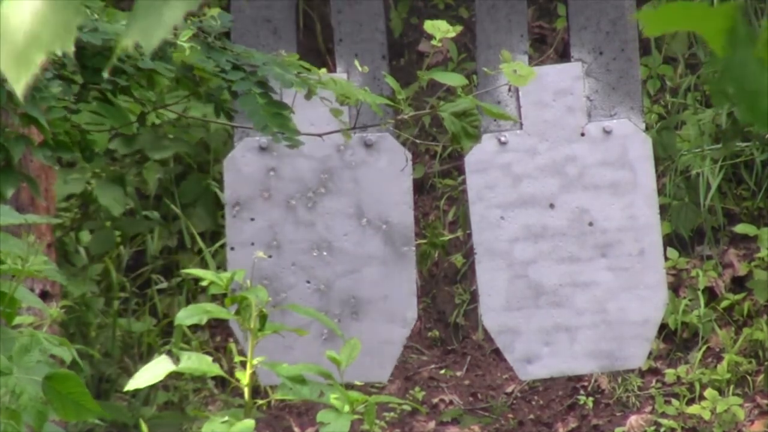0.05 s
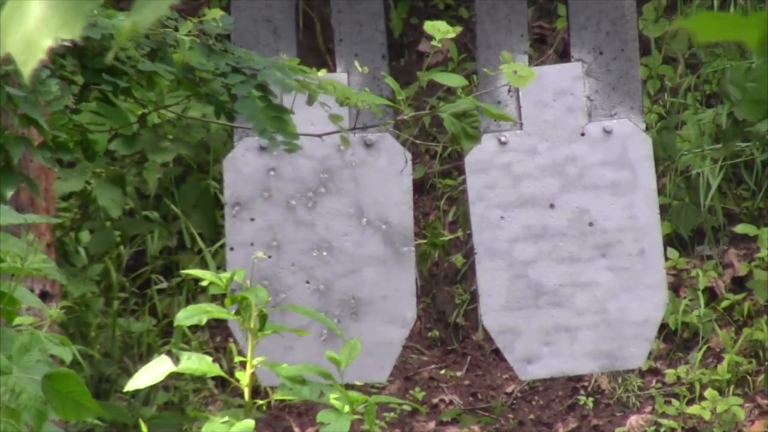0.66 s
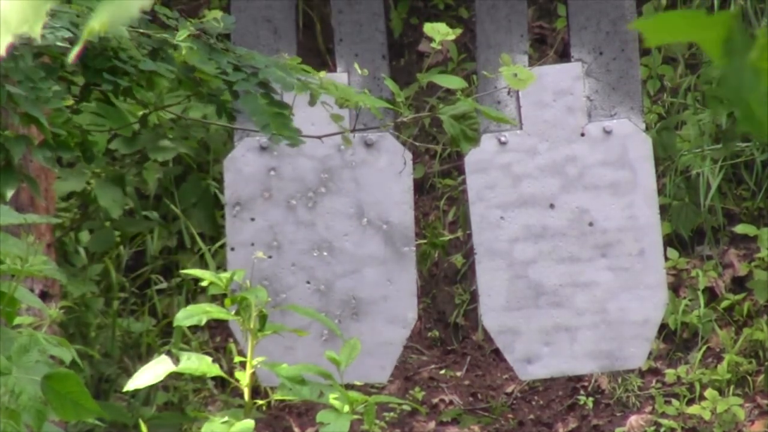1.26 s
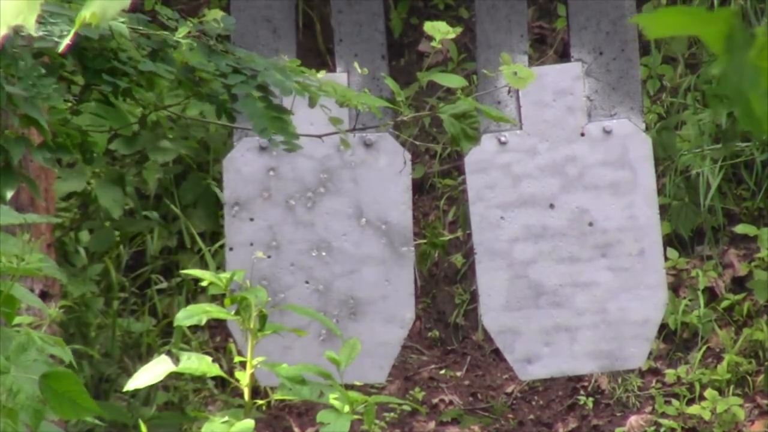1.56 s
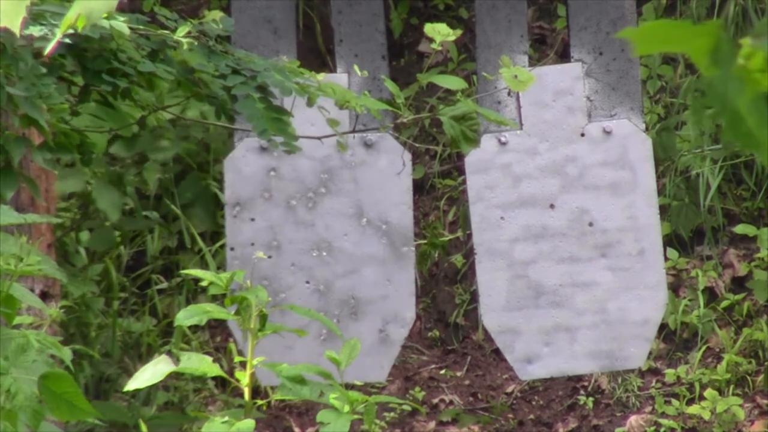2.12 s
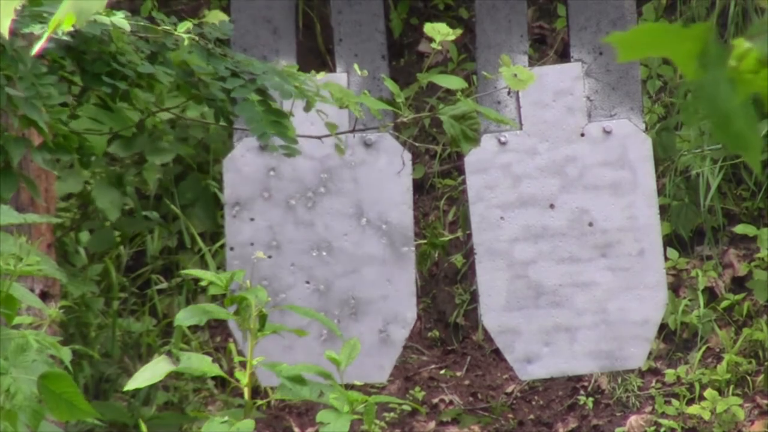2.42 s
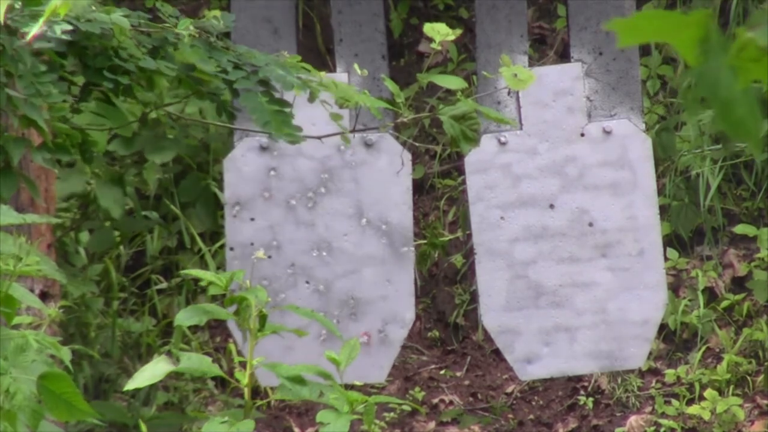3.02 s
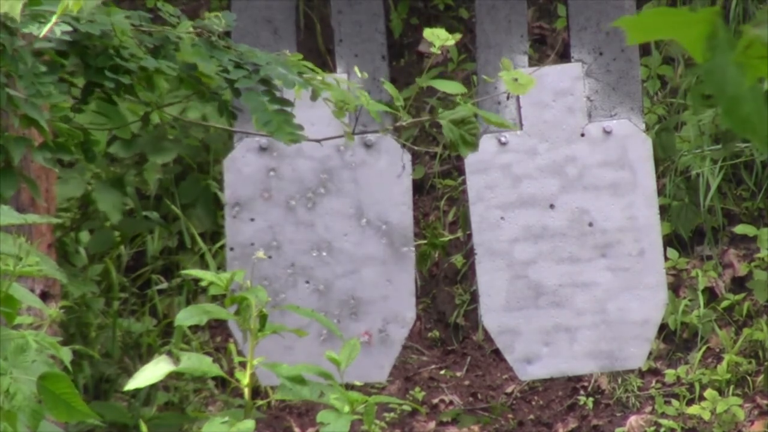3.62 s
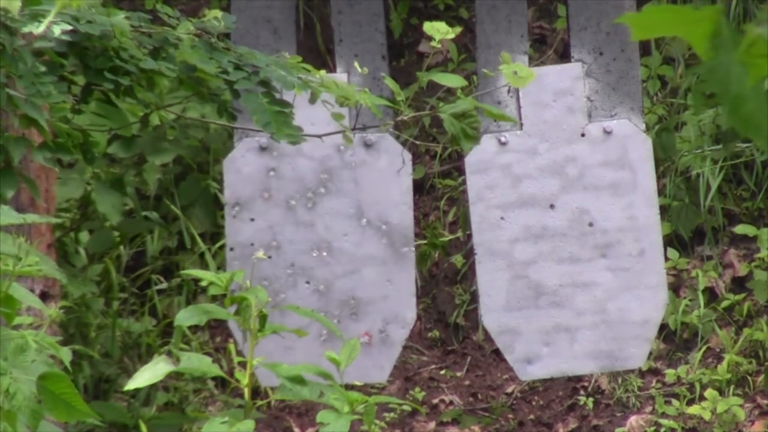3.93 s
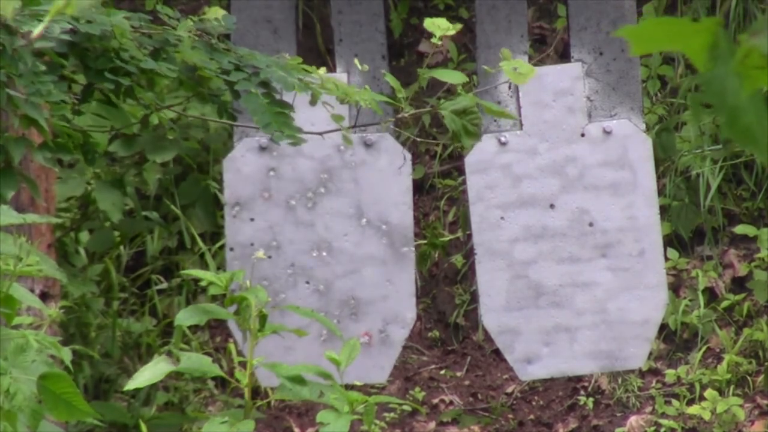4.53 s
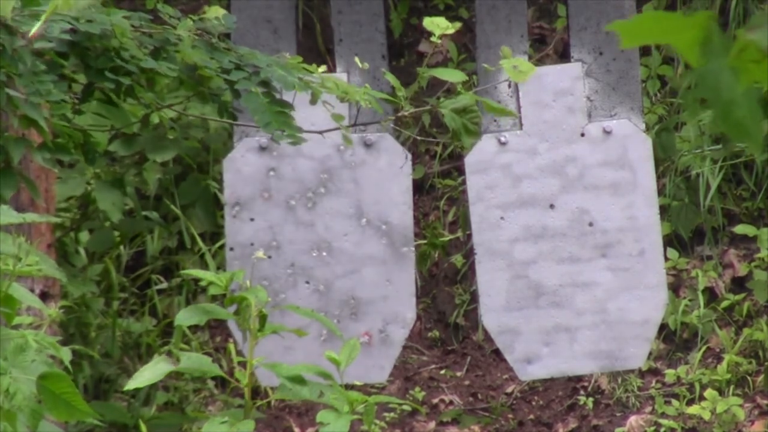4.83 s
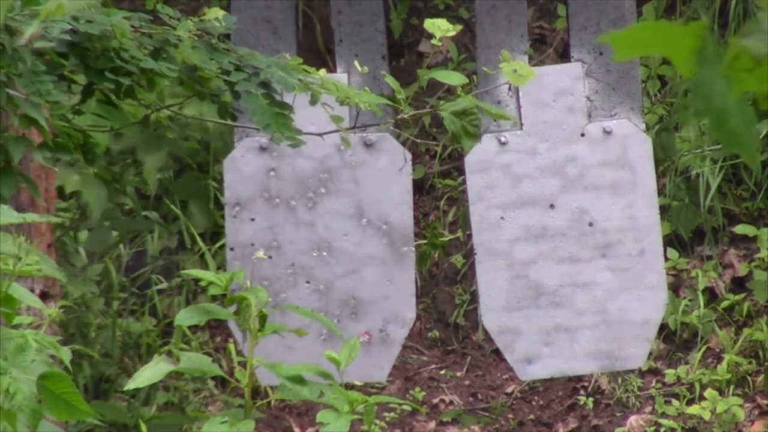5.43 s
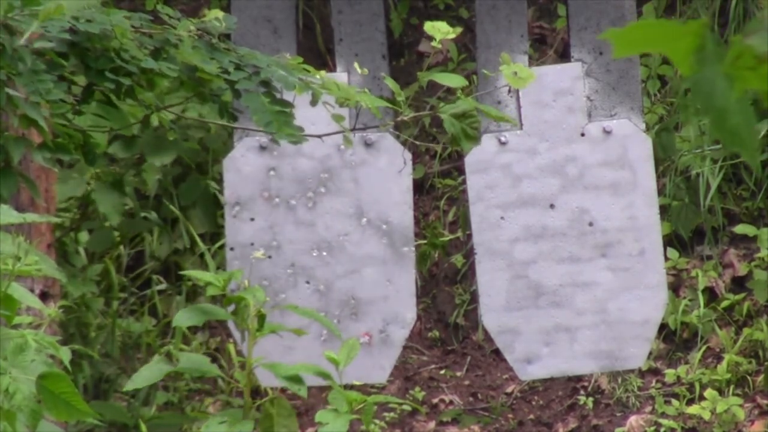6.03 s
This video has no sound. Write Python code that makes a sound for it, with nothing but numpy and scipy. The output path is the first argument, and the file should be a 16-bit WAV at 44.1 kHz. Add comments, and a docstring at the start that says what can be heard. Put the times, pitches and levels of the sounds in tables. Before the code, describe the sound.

Heard from beside steel plates at the edge of a quiet wood, a rapid string of about ten rifle shots cracks in, slamming and ringing the metal and slightly distorting the microphone. Two duller, distant rifle reports follow, and small fragments patter onto leaves and ground. After this short lull, a second string of five loud clanging hits arrives, each trailing a dark echo.

```python
"""Rapid rifle fire on two steel plates at the edge of a wood, heard from beside the plates.
Each bullet cracks past, splashes on the steel and rings it; the trees scatter the bang.
Rifle reports swell in from far off, and bits of debris drop through the leaves, mostly in
the pause, over a quiet bed of air. The microphone overloads with a low thump on the hits,
and a limiter holds each bang flat."""
import sys
import numpy as np
from scipy import signal
from scipy.fft import rfft, irfft
from scipy.io import wavfile
from scipy.ndimage import uniform_filter1d

SR = 44100
rng = np.random.default_rng(int(sys.argv[2]) if len(sys.argv) > 2 else 0)


def int16_out(signal):
    """Quantize to a 16-bit WAV file."""
    q = np.round(np.clip(np.atleast_2d(signal).T, -1, 1) * 32767)
    wavfile.write(sys.argv[1], SR, q.astype(np.int16))


N = 276066

# bullets on steel: t/s, strength/dB, lead of the supersonic crack/s, main plate mode trim/dB
BULLET_HITS = [(-.095, -.5, 0.018, 5), (.480, .3, 0.02, -3), (1.092, 1, 0.016, -4),
               (1.352, 0.1, 0.018, 0.5), (1.605, -0.5, 0.015, -18), (1.802, -0.5, 0.019, -19),
               (2.066, 0.9, .014, -4), (2.460, -.5, .016, 1), (2.651, -0.4, 0.023, -1.5),
               (2.822, -0.5, 0.015, -22), (5.088, -0.9, 0.016, -6), (5.327, -2.1, .012, -9),
               (5.505, 0.5, 0.016, -5), (5.767, -0.2, 0.0045, -3), (6.122, -2.5, .016, -3)]
# far muzzle reports: t/s, level/dB, swell/s
FAR_REPORTS = [(.923, -12, 0.027), (3.022, -14.5, 0.0096), (3.219, -11, 0.036)]
# small bits landing: t/s, level/dB, centre f/Hz
DEBRIS_TAPS = [(1.209, -34, 11000), (2.748, -30, 11000), (2.915, -34, 11000), (3.066, -37, 8100),
               (3.147, -40.5, 7860), (3.240, -16.5, 2170), (3.595, -29, 1850), (4.266, -33.5, 2170),
               (4.378, -31.5, 1790), (4.524, -38, 4930), (4.582, -37, 970)]
# larger pieces landing: t/s, level/dB, knock f/Hz, knock/dB, time until flat/s, scrape/dB, thud/dB
DEBRIS_CLACKS = [(3.828, -18, 1490, 2.5, .026, -20.5, -40), (4.147, -18.5, 4400, 2, 0.024, -4.5, -9)]
# steel plate modes, the main one first: f/Hz, level/dB relative to the bang
PLATE_MODES = [(2283, -14), (583, -23), (1012, -22), (1281, -23), (1685, -19), (2988, -24), (4403, -23),
               (4909, -22), (6696, -23), (7665, -25), (8130, -27), (8548, -29), (9062, -32), (9399, -31),
               (9657, -33), (10249, -32), (10992, -36), (11337, -35), (12696, -41), (13632, -41)]
# tone of the crack and splash, the bang, the wood's echo, the far rifle, the air: f/Hz, level/dB
SPLASH_EQ = [(30, 8), (150, 11.5), (500, 9.5), (1500, 6), (3000, 4.5), (6000, -2.5), (10000, -11.5),
             (16000, -21.5)]
BANG_EQ = [(30, -14.5), (130, -20), (250, -19.5), (400, -8), (550, -1.5), (800, -2), (1500, 0),
           (2300, -0.5), (4000, -1), (6000, -9), (9000, -18), (12000, -23.5), (16000, -39)]
ECHO_EQ = [(30, -32), (110, -17), (250, -10.5), (520, 6), (1000, 6.5), (2000, 5), (4000, -11), (8000, -28),
           (16000, -64)]
REPORT_EQ = [(30, -22), (130, -24), (250, -21), (500, -2.5), (900, 3.5), (1500, 2), (2500, -2.5),
             (4000, -8.5), (7000, -19.5), (11000, -33), (16000, -46)]
AIR_EQ = [(15, -25), (25, 11), (66, -20), (123, 4.5), (185, -1.5), (317, -1), (416, -1), (695, 0),
          (1100, -3), (3340, -10), (10700, -27.5), (14800, -26), (16000, -22)]
# decay of the steel, the near trees and the deep wood: f/Hz, t60/s
STEEL_DECAY = [(500, .45), (2300, .4), (5000, .28), (8000, .24), (14000, .2)]
NEAR_DECAY = [(100, 0.22), (500, 0.53), (1500, 0.34), (3000, 0.3), (6000, 0.27), (12000, 0.22)]
DEEP_DECAY = [(100, 1.0), (600, 1), (2000, 0.66), (8000, 0.74)]
# stereo width, nearly mono in lows and mids, wider in the treble: f/Hz, side level/dB relative to mid
STEREO_WIDTH = [(50, -46), (130, -46), (400, -60), (1000, -64), (2000, -31), (4000, -23.5), (8000, -11.5),
                (14000, -7)]


def amp(db):
    """Decibels to gain."""
    return 10 ** (np.asarray(db) / 20)


def unit_rms(x):
    """Scales to rms 1."""
    return x / np.sqrt(np.mean(x ** 2) + 1e-20)


def curve(points, hz):
    """Reads a table on a log-frequency axis."""
    f, value = np.transpose(points)
    return np.interp(np.log(hz + 1), np.log(f + 1), value)


def add(mix, s, sound):
    """Mixes a sound in at time s."""
    start = round(s * SR)
    sound = sound[..., max(-start, 0):]
    part = mix[:, max(start, 0):][:, :sound.shape[-1]]
    part += sound[..., :part.shape[1]]


def attack(seconds):
    """One second of a smooth rise toward 1."""
    return 1 - np.exp(-np.arange(SR) / SR / seconds)


def decay(t60):
    """One second of exponential fade."""
    return np.exp(-np.log(1000) * np.arange(SR) / SR / t60)


def waver(step_s, depth_db):
    """One second of gain that drifts to a new random value every step."""
    t = np.arange(SR) / SR
    return amp(depth_db * np.interp(t / step_s, np.arange(1000), rng.standard_normal(1000)))


def noise(eq, size=SR):
    """Coloured stereo noise of rms 1, nearly mono below the treble."""
    hz = np.fft.rfftfreq(size, 1 / SR)
    mid, side = rfft(rng.standard_normal((2, size))) * amp(curve(eq, hz))
    side = side * amp(curve(STEREO_WIDTH, hz))
    return unit_rms(irfft(np.array([mid + side, mid - side]), size))


def scatter(eq, t60s):
    """One second of dense reflections from trunks and leaves; treble dies before the mids."""
    hz, t, bands = signal.stft(noise(eq), SR, nperseg=512)
    fade = amp(-60 * t / curve(t60s, hz)[:, None])
    return signal.istft(bands * fade, SR, nperseg=512)[1][:, :SR]


def crack():
    """The supersonic bullet passes just ahead of its impact."""
    return noise(SPLASH_EQ) * attack(0.0073) ** 3 * decay(0.29)


def splash():
    """Lead bursts on the steel in a short, heavy blast."""
    return noise(SPLASH_EQ) * attack(0.0074) * decay(0.089)


def bang(strength_db, clang_hz=1700, glancing_db=1.5, tilt_db_per_octave=0.11):
    """The near trees scatter the impact; a squarer hit clangs more in the mids."""
    hz, level = np.transpose(BANG_EQ)
    octaves = np.log2(hz / clang_hz)
    clang_db = max(5.5 + 6 * strength_db, glancing_db)
    level = level + tilt_db_per_octave * octaves + clang_db * np.exp(-2 * octaves ** 2)
    return scatter(np.transpose([hz, level]), NEAR_DECAY) * attack(0.0081)


def plate_ring(main_db, detune=.0012):
    """The strike point sets how hard each mode rings; swing and reflections make each one waver."""
    t, out = np.arange(SR) / SR, np.zeros((2, SR))
    chance = rng.standard_normal((len(PLATE_MODES), 4))
    for k, ((hz, db), (strike, bend, phase, skew)) in enumerate(zip(PLATE_MODES, chance)):
        stereo_phase = np.array([[1], [-1]]) * skew * amp(curve(STEREO_WIDTH, hz))
        tone = np.sin(2 * np.pi * (hz * (1 + detune * bend) * t + phase) + stereo_phase)
        strike_db = main_db if k == 0 else 7 * np.tanh(strike) - 3
        envelope = decay(curve(STEEL_DECAY, hz)) * waver(step_s=.014, depth_db=4)
        out += amp(db + strike_db) * envelope * tone
    return out


def wood_echo(attack_s):
    """The deep wood answers with a long, dark tail."""
    return scatter(ECHO_EQ, DEEP_DECAY) * attack(attack_s)


def bullets(crack_db=-15, splash_db=18, bang_db=5, echo_db=-16):
    """Each shot stacks up: crack first, then splash, bang, ringing steel and echo."""
    out = np.zeros((2, N))
    for s, db, lead_s, main_db in BULLET_HITS:
        add(out, s - lead_s, amp(crack_db) * crack())
        hit = amp(splash_db) * splash()
        hit += amp(bang_db) * (bang(db) + plate_ring(main_db))
        hit += amp(echo_db) * wood_echo(attack_s=0.012)
        add(out, s, amp(db) * hit)
    return out


def air(level_db=-57.5, side_db=-12):
    """Quiet wash of the wood, a little different left and right."""
    side = np.array([[1], [-1]]) * noise(AIR_EQ, size=N)[0]
    return amp(level_db) * unit_rms(noise(AIR_EQ, size=N) + amp(side_db) * side)


def reports(echo_db=-15):
    """Far muzzle blasts come through the trees as a soft swell with a long tail."""
    out = np.zeros((2, N))
    for s, db, swell_s in FAR_REPORTS:
        swell = scatter(REPORT_EQ, NEAR_DECAY) * attack(swell_s)
        tail = amp(echo_db) * wood_echo(attack_s=0.009)
        add(out, s, amp(db) * (swell + tail))
    return out


def rustle(hz, bass_db=-28, low_db=-15, high_db=-18, top_db=-40):
    """One second of grainy, unpitched contact with leaves and ground, in a broad band around hz."""
    eq = [(hz / 10, bass_db), (hz / 5, low_db), (hz / 1.7, 0),
          (hz * 0.92, -1), (hz * 3, high_db), (hz * 10, top_db)]
    grain = unit_rms(waver(step_s=.001, depth_db=3))
    return noise(eq) * grain


def tap(hz, t60, **eq):
    """A brief contact: rustle with a sharp front."""
    return rustle(hz, **eq) * attack(0.001) * decay(t60)


def debris(tap_t60=0.014, stir_db=-16, hop_s=0.012, hop_db=-12.5):
    """Small bits tap the ground, stir the leaves and hop once."""
    out = np.zeros((2, N))
    for s, db, hz in DEBRIS_TAPS:
        add(out, s, amp(db) * (tap(hz, tap_t60) + amp(stir_db) * tap(hz, t60=0.15)))
        add(out, s + hop_s, amp(db + hop_db) * tap(hz, tap_t60))
    return out


def clacks():
    """A piece knocks down on one end, scrapes, slaps flat with a snap and a thud; the leaves settle."""
    out, t = np.zeros((2, N)), np.arange(SR) / SR
    for s, db, hz, knock_db, flat_s, scrape_db, thud_db in DEBRIS_CLACKS:
        knock = amp(knock_db) * tap(hz, t60=0.014, bass_db=-32, low_db=-31, high_db=-25, top_db=-36)
        grit = rustle(hz=4300, bass_db=-18, low_db=1, high_db=-19, top_db=-26)
        scrape = amp(scrape_db) * grit * attack(0.0058) * (t < flat_s)
        thud = amp(thud_db) * tap(hz=100, t60=0.029)
        slap = amp(-1) * tap(hz=1600, t60=0.043)
        snap = amp(-6) * tap(hz=6500, t60=0.02)
        settle = amp(scrape_db - 9) * tap(hz=5500, t60=.17)
        add(out, s, amp(db) * (knock + scrape))
        add(out, s + flat_s, amp(db) * (slap + snap + thud + settle))
    return out


def patter(count=18, from_s=3.9, to_s=4.6, loudest_db=-48.5, spread_db=6, centre_hz=1800):
    """Fainter, duller bits come down at random in the pause."""
    out = np.zeros((2, N))
    for when, faintness, pitch in rng.random((count, 3)):
        hz = centre_hz * 2 ** (pitch - .5)
        bit = rustle(hz, high_db=-24, top_db=-50) * attack(0.0028) * decay(0.053)
        add(out, from_s + when * (to_s - from_s), amp(loudest_db - spread_db * faintness) * bit)
    return out


def scene():
    """Shots and debris over the quiet air."""
    return bullets() + reports() + debris() + patter() + clacks() + air()


def overload(x, ceiling_db=8):
    """The capsule saturates; its bias flutters and shifts, giving a low thump, then creeps back."""
    ceiling = amp(ceiling_db)
    clipped = x / (1 + (x / ceiling) ** 4) ** (1 / 4)
    stress = ((clipped / ceiling) ** 8).mean(0)  # near 1 with the diaphragm at its limit, else near 0

    def lowpassed_stress(order, hz):
        return signal.sosfilt(signal.butter(order, hz, fs=SR, output="sos"), stress)

    flutter = amp(1) * lowpassed_stress(order=2, hz=260)
    shift = lowpassed_stress(order=1, hz=40)
    creep = amp(-14) * lowpassed_stress(order=1, hz=3)
    for hz in (1500, 4500):  # all-passes: the input stage smears the flat tops in phase
        poles = signal.iirpeak(hz, 1, SR)[1]
        clipped = signal.lfilter(poles[::-1], poles, clipped)
    return clipped, ceiling * (flutter + shift + creep)


def limiter_gain(x, threshold_db=-15, release_db_per_s=190):
    """Gain that ducks at once on a bang and comes back as it fades."""
    power_db = 10 * np.log10(abs(uniform_filter1d((x ** 2).mean(0), size=260)) + 1e-12)
    release = np.arange(N) / SR * release_db_per_s
    envelope_db = np.maximum.accumulate(power_db + release) - release
    over_db = np.maximum(envelope_db - threshold_db, 0)
    return amp(-uniform_filter1d(over_db, size=60))


def record(dry, high_cut_hz=16100):
    """Overloaded microphone into a limiter and a steep high cut."""
    clipped, thump = overload(dry)
    limited = (clipped + thump) * limiter_gain(clipped)
    high_cut = signal.firwin(511, high_cut_hz, window=("kaiser", 9), fs=SR)
    return signal.oaconvolve(limited, high_cut[None], "same")


dry = scene()
out = record(dry)
int16_out(out)
```